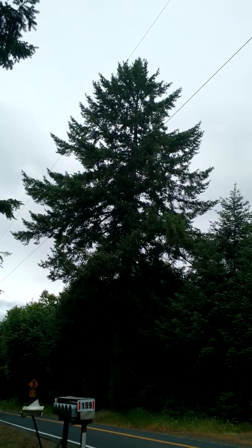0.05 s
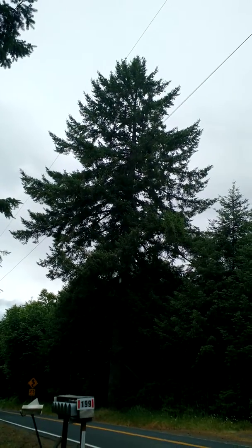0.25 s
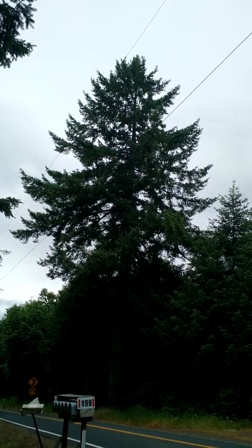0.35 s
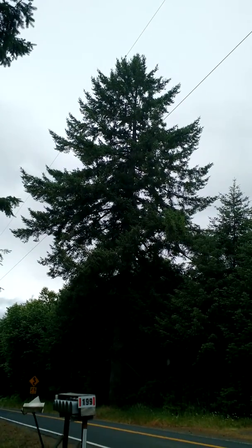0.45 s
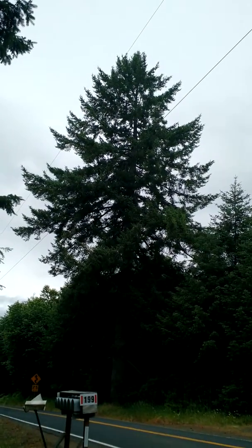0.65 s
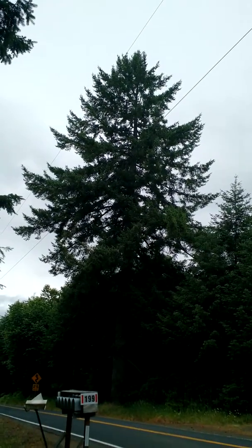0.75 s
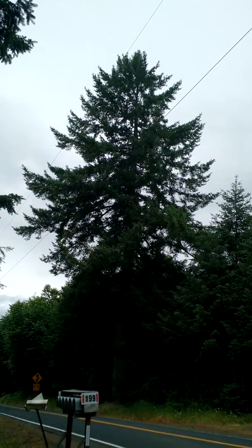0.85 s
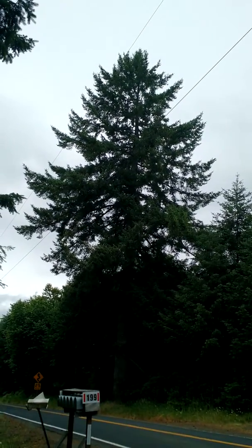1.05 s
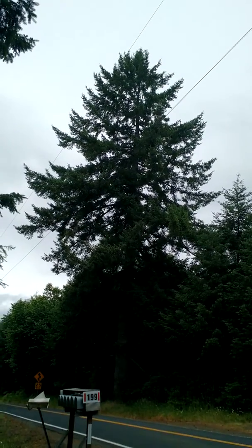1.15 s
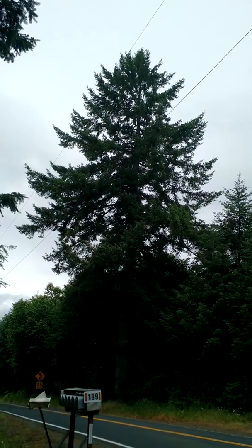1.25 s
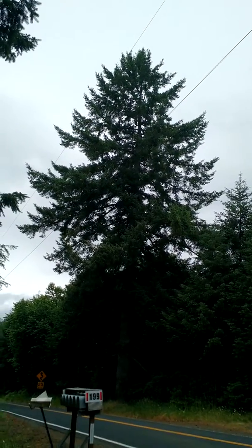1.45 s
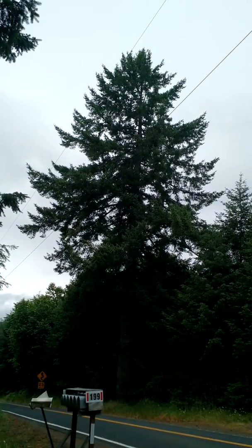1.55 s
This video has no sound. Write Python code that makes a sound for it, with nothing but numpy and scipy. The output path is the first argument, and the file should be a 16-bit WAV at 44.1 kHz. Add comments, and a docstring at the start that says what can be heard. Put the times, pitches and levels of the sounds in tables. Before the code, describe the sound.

A raven croaks twice from a tall fir beside a forest road, each harsh rattle rising into a hollow note with a short echo. Faint distant traffic, hiss and soft bumps on the hand-held microphone lie underneath.

```python
"""At a roadside by a forest, a raven croaks twice from a tall fir. Each croak opens as a harsh rattle,
rough pulses ringing the bird's throat, and slides up into a clear, hollow note.
Branches scatter the sound and the forest edge answers; far traffic swells over a faint hiss.
The hand-held stereo microphone picks up a little rumble and a few soft bumps."""
import sys
import numpy as np
from scipy import signal
from scipy.fft import rfft, irfft, next_fast_len
from scipy.io import wavfile
from scipy.ndimage import map_coordinates

SR = 44100
rng = np.random.default_rng(int(sys.argv[2]) if len(sys.argv) > 2 else 0)


def to_wav(s):
    """Save 16-bit WAV."""
    ch = np.atleast_2d(s).T  # columns
    pcm = np.round(np.clip(ch, -1, 1) * 32767)  # PCM
    wavfile.write(sys.argv[1], SR, pcm.astype(np.int16))


N = 70560

# Each row: start in seconds, rattle level in dB, rattle and note pitch in Hz, middle of the slide and its
# easing time in seconds, note level in dB, note fade-in and time until it dies away in seconds.
CROAK_CALLS = [(0.186, -41.5, 476.2, 572, 0.0806, 0.0049, -43.5, 0.014, 0.057),
               (0.6381, -41, 475.9, 605.6, 0.084, 0.0094, -38.5, 0.039, 0.041)]
def raven():
    """The bird's croaks and their echoes, as mid (what both ears share) and side (how they differ)."""
    out = np.zeros((2, N))
    for row in CROAK_CALLS:
        bird = croak(*row)
        out += from_the_fir(bird) + branches(bird) + forest_edge(bird)
    return out


def croak(start, rattle_db, low_hz, high_hz, slide_at, slide_s, note_db, attack_s, hold_s):
    """One call: the rattle and the note share one upward slide in pitch."""
    t = np.arange(N) / SR - start
    slide = (1 + np.tanh((t - slide_at) / slide_s / 2)) / 2
    pitch_hz = low_hz + (high_hz - low_hz) * slide
    return amp(rattle_db) * rattle(t, pitch_hz) + amp(note_db) * note(t, pitch_hz, attack_s, hold_s)


# Each row: seconds into the croak, then burst level, treble boost and hollow tone level in relative dB.
RATTLE_BURSTS = [(0.001, -11.5, -10, -14), (0.021, -4, -1, -9), (0.041, -0.5, 1, -8.5),
                 (0.0628, 3.5, -4, -4), (0.0865, -9, -3.5, -7)]
def rattle(t, pitch_hz):
    """A quick run of bursts that grow louder and then duller."""
    return sum(amp(db) * burst(t - start, pitch_hz, treble_db) + amp(hollow_db) * hollow(t - start)
               for start, db, treble_db, hollow_db in RATTLE_BURSTS)


# How the throat shapes the rattle. Each row: frequency in Hz, relative level in dB.
THROAT_COLOUR = [(250, -44.5), (410, -30.5), (510, -10), (700, -9), (950, 5.5), (1250, -4.5), (1500, -10.5),
                 (1720, -2), (1950, -14), (2400, -4), (2900, -11.5), (3350, -1.5), (3800, -4.5),
                 (4200, -15.5), (4900, -17.5), (5600, -30), (8000, -31.5), (15000, -92)]
def burst(t, pitch_hz, treble_db, length_s=0.0083, attack_s=0.00183, jitter=0.022, rasp=0.28):
    """A handful of rough pulses and puffs of air ring the throat; the treble flares late and briefly."""
    sounding = (t > 0) * (t < 3 * length_s)
    cycles = np.cumsum(pitch_hz * (1 + jitter * wobble(400)) * sounding) / SR
    pulses = np.sqrt((1 - rasp) * SR / pitch_hz) * voice_pulses(cycles)
    puffs = (1 + np.cos(2 * np.pi * (cycles - 0.5))) ** 2 / 2
    air = np.sqrt(rasp) * puffs * rng.standard_normal(N)
    swell = envelope(t, attack_s, length_s, fall_db_per_s=3200)
    voice = resonate(swell * (pulses + air), THROAT_COLOUR)
    voice /= np.sqrt(np.sum(voice ** 2) / (length_s * SR))
    low = filtered(voice, lambda hz: 1 / (1 + (hz / 2160) ** 6))
    flare_db = 2 * np.exp(-((t - 0.0076) / 0.0032) ** 2)
    return low + (voice - low) * amp(treble_db + flare_db)


def voice_pulses(cycles, scatter_db=0.83):
    """One sharp click in the middle of each cycle of the voice, each a slightly different size."""
    centres = np.interp(np.arange(int(cycles[-1])) + 0.5, cycles, np.arange(N))
    taps = centres.astype(int)[:, None] + np.arange(-7, 9)
    offset = taps - centres[:, None]
    sizes = amp(scatter_db * rng.standard_normal(N)[:len(centres), None])
    clicks = sizes * np.sinc(offset) * np.sinc(offset / 8)  # lets a click fall between samples
    return np.bincount(np.clip(taps, 0, N - 1).ravel(), clicks.ravel(), N)


def hollow(t, ring_hz=508, peak_s=0.006):
    """The throat's lowest tone swells with a burst and rings on."""
    age = np.maximum(t, 0) / peak_s
    return np.sin(2 * np.pi * ring_hz * t) * (age * np.exp(1 - age)) ** 2


# The pure tones that make up the note. Each row: multiple of the pitch, relative level in dB.
NOTE_HARMONICS = [(1, -8), (2, -1), (3, -22.5), (4, -26), (5, -24), (6, -28), (7, -29)]
def note(t, pitch_hz, attack_s, hold_s, start_s=0.069, jitter=0.02115):
    """The clear end of the croak: it grows purer as all tones but the second fade."""
    phase = 2 * np.pi * np.cumsum(pitch_hz * (1 + jitter * wobble(250))) / SR
    age = np.maximum(t - start_s, 0)
    fade = amp(-170 * age)
    tone = sum(amp(db) * np.sin(k * phase) * (1 if k == 2 else fade) for k, db in NOTE_HARMONICS)
    swell = envelope(age, attack_s, hold_s, fall_db_per_s=329)
    flutter = 1 - 0.4 * np.sin(np.pi * (t - 0.0068) / 0.0214) ** 2  # still pulsing with the rattle
    return np.sqrt(2) * tone * swell * flutter


# Single echoes off the ground and a far trunk. Each row: delay in seconds, relative level in dB.
BOUNCES = [(0.009, -13), (0.069, -19.5)]
# The bird's direction. Each row: frequency in Hz, phase shift of side against mid in radians.
SIDE_PHASE = [(550, 2.45), (900, 4.1), (1900, 4.3), (2450, 2.3), (2750, 0.38), (3050, 1), (3400, 1.9),
              (3900, 1.8), (4400, 4), (5500, 5.1)]
def from_the_fir(bird):
    """The croak and its two bounces arrive from a little to the right."""
    mid = bird + sum(amp(db) * np.pad(bird, (round(delay * SR), 0))[:N] for delay, db in BOUNCES)
    side = amp(-4.5) * filtered(mid, lambda hz: np.exp(1j * along(SIDE_PHASE, hz)))
    return np.array([mid, side])


# How long the branches echo. Each row: frequency in Hz, seconds to fade by 60 dB.
BRANCH_DECAY = [(500, 0.24), (1100, 0.14), (3500, 0.31), (8000, 0.18)]
# The tone of that echo. Each row: frequency in Hz, relative level in dB.
BRANCH_TONE = [(500, -3), (1100, -2), (2000, 3), (3500, -7.5), (8000, 5)]
def branches(bird):
    """Nearby branches scatter the croak into a quick, short echo."""
    return amp(-7) * echo(bird, BRANCH_DECAY, BRANCH_TONE, build_s=0.0059)


# How long the forest echoes. Each row: frequency in Hz, seconds to fade by 60 dB.
FOREST_DECAY = [(500, 0.67), (1100, 1.21), (3500, 0.86), (8000, 0.26)]
# The tone of that echo. Each row: frequency in Hz, relative level in dB.
FOREST_TONE = [(500, 0), (1100, -2), (2000, 0), (3500, -7.5), (8000, 13.5)]
def forest_edge(bird):
    """The forest edge answers with a slower, longer echo."""
    return amp(-7) * echo(bird, FOREST_DECAY, FOREST_TONE, build_s=0.08)


def echo(sound, decay, colour, build_s):
    """Scattered sound builds up and dies away, each frequency at its own speed."""
    hz, t, spectrum = signal.stft(rng.standard_normal((2, N)), SR, nperseg=256)
    shape = amp(-60 * t / along(decay, hz)[:, None]) * (1 - np.exp(-t / build_s))
    shape /= np.sqrt(np.mean(shape ** 2, axis=1, keepdims=True) * N)
    tail = signal.istft(spectrum * shape * amp(along(colour, hz))[:, None], SR, nperseg=256)[1]
    return signal.fftconvolve(sound[None], tail, axes=1)[:, :N] * mid_side(0, -4)


# How the traffic swells. Each row: time in seconds, level in dB.
TRAFFIC_SWELL = [(0, -60), (0.4, -57.5), (0.8, -57), (1.25, -55), (1.6, -58.5)]
# The tone of tyres on the road. Each row: frequency in Hz, relative level in dB.
TYRE_COLOUR = [(40, -10), (150, -6), (300, -4.5), (600, -4), (900, -0.5), (1200, -8), (1600, -13.5),
               (2200, -21), (3200, -29), (6000, -50)]
def traffic():
    """Far tyre noise slowly swells, wavering a little."""
    level_db = curve(TRAFFIC_SWELL, np.arange(N) / SR) + 0.5 * wobble(7.4)
    return amp(level_db) * noise(TYRE_COLOUR) * mid_side(0, -4.5)


# How the rumble comes and goes. Each row: time in seconds, level in dB.
RUMBLE_SWELL = [(0, -51), (0.17, -46.5), (0.25, -43), (0.4, -47.5), (0.5, -51), (0.75, -56), (0.9, -48),
                (1.2, -52.5), (1.6, -51)]
# Soft knocks from the hand. Each row: time of the peak in seconds, level in dB.
HAND_BUMPS = [(0.519, -55.5), (0.87, -43.5), (0.906, -51), (1.293, -50), (1.328, -46.5)]
# The tone of the rumble and of the bumps. Each row: frequency in Hz, relative level in dB.
RUMBLE_TONE = [(4, -2), (13, 4), (25, -8.5), (45, -20), (80, -16), (125, -21), (200, -26.5), (500, -37),
               (2000, -86)]
BUMP_TONE = [(30, -1), (150, -4.5), (300, 1), (500, -32), (1500, -39)]
def handling(rise_s=0.004):
    """The hand on the microphone rumbles and bumps, pushing left and right nearly opposite ways."""
    t = np.arange(N) / SR
    rumble = amp(curve(RUMBLE_SWELL, t)) * noise(RUMBLE_TONE) * mid_side(-21, 0)
    bumps = np.zeros(N)
    for peak_at, db in HAND_BUMPS:
        age = np.maximum((t - peak_at) / rise_s + 1, 0)
        bumps += amp(db) * age * np.exp(1 - age)
    return rumble + bumps * noise(BUMP_TONE) * mid_side(-9, 0)


# The tone of the hiss. Each row: frequency in Hz, relative level in dB.
HISS_COLOUR = [(500, 0.7), (3000, 3), (4500, 1.2), (7500, 0.04), (9000, 1.8), (11000, -2), (15000, -2.1)]
def hiss():
    """A faint, even hiss lies behind everything."""
    return amp(-62) * noise(HISS_COLOUR) / np.sqrt(2)


def amp(db):
    """Turn decibels into a number to multiply by."""
    return 10 ** (np.asarray(db) / 20)


def mid_side(mid_db, side_db):
    """One gain for the mid and one for the side."""
    return amp([[mid_db], [side_db]])


def envelope(t, attack_s, hold_s, fall_db_per_s):
    """Fade in, stay level until hold_s, then die away."""
    return np.clip(t / attack_s, 0, 1) * amp(-fall_db_per_s * np.maximum(t - hold_s, 0))


def along(points, hz):
    """Read between a table's frequencies, on a log scale."""
    table_hz, values = np.transpose(points)
    return np.interp(np.log(hz + 1), np.log(table_hz + 1), values)


def curve(points, t):
    """Read between a table's times."""
    return np.interp(t, *np.transpose(points))


def wobble(rate):
    """A smooth curve through `rate` random values a second."""
    values = rng.standard_normal(int(N * rate / SR) + 4)
    return map_coordinates(values, [np.arange(N) * rate / SR])


def filtered(sound, response):
    """Multiply each frequency of a sound by response(hz)."""
    size = next_fast_len(N + SR // 2)
    return irfft(rfft(sound, size) * response(np.fft.rfftfreq(size, 1 / SR)), size)[..., :N]


def resonate(sound, colour, size=4096):
    """Colour a sound so that the ringing comes after each pulse, never before it."""
    cepstrum = irfft(np.log(amp(along(colour, np.fft.rfftfreq(size, 1 / SR)))))
    cepstrum[1:size // 2] *= 2
    cepstrum[size // 2 + 1:] = 0
    ring = irfft(np.exp(rfft(cepstrum)))
    return signal.fftconvolve(sound, ring)[:N]


def noise(colour):
    """Coloured mid and side noise with an average strength (rms) of 1."""
    shaped = filtered(rng.standard_normal((2, N)), lambda hz: amp(along(colour, hz)))
    return shaped / np.sqrt(np.mean(shaped ** 2) + 1e-20)


def scene():
    """The bird and its surroundings, as left and right."""
    mid, side = raven() + traffic() + hiss() + handling()
    return np.array([mid + side, mid - side])


# How strongly the stereo is widened. Each row: frequency in Hz, depth from 0 to 1.
WIDENING_DEPTH = [(450, 0.052), (1250, 0.94), (2300, 1), (2700, 1), (4000, 0.43), (5400, 0.79),
                  (7000, 0.63), (9000, 0.52), (14000, 0.008)]
def record(dry, repeat_hz=2686, top_hz=15500):
    """Stereo widening favours side and mid in turn up the frequencies; nothing passes above top_hz."""
    alike = lambda hz: -along(WIDENING_DEPTH, hz) * np.cos(2 * np.pi * hz / repeat_hz)
    mid = filtered((dry[0] + dry[1]) / 2, lambda hz: np.sqrt(1 + alike(hz)))
    side = filtered((dry[0] - dry[1]) / 2, lambda hz: np.sqrt(1 - alike(hz)))
    return filtered(np.array([mid + side, mid - side]), lambda hz: hz < top_hz)


dry = scene()
out = record(dry)
to_wav(out)
```